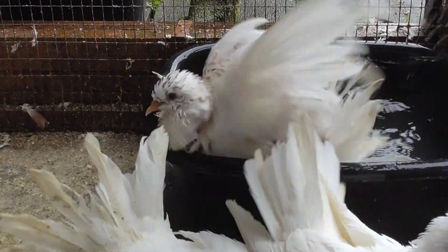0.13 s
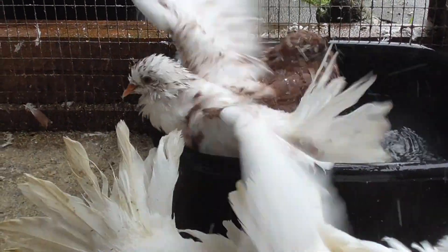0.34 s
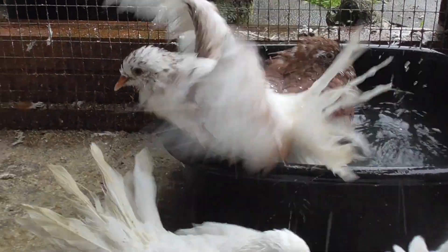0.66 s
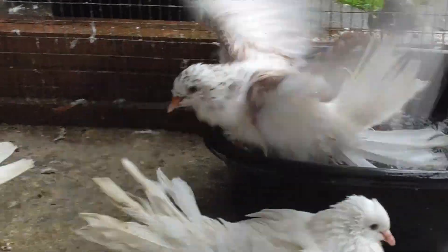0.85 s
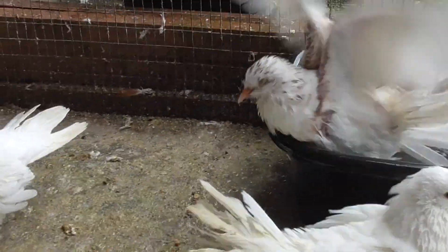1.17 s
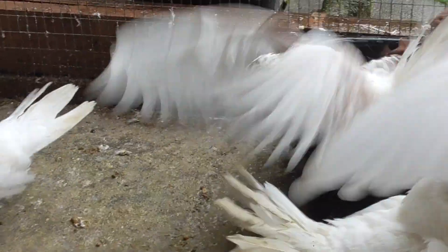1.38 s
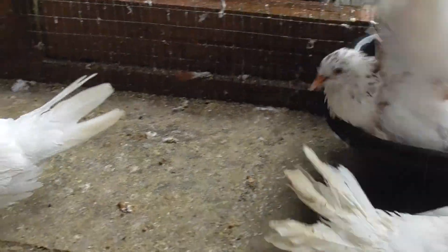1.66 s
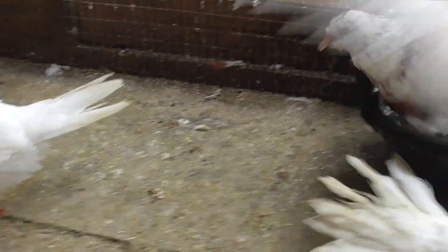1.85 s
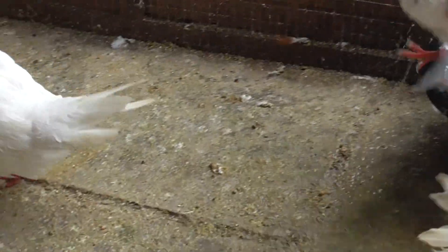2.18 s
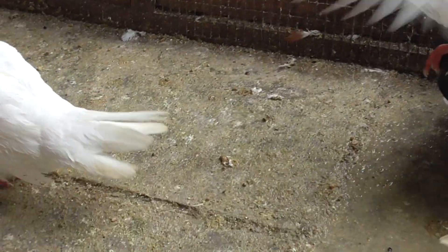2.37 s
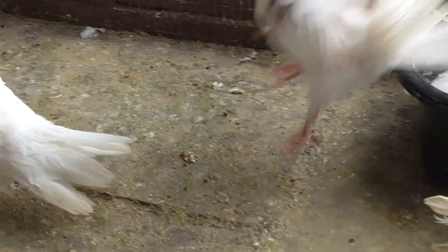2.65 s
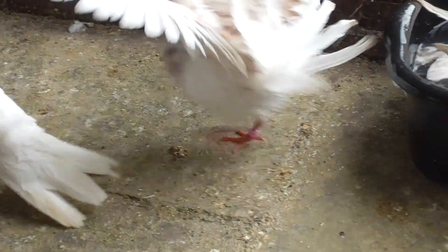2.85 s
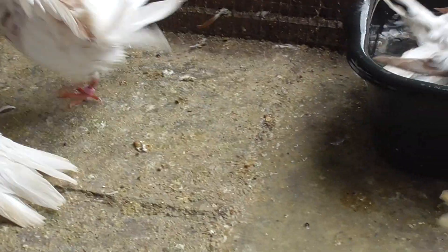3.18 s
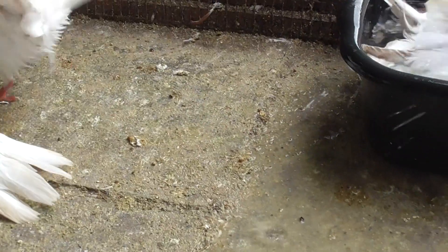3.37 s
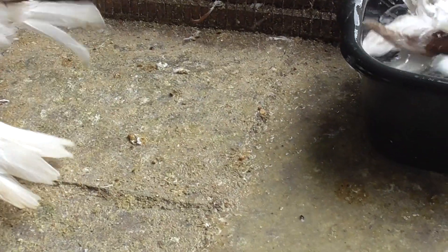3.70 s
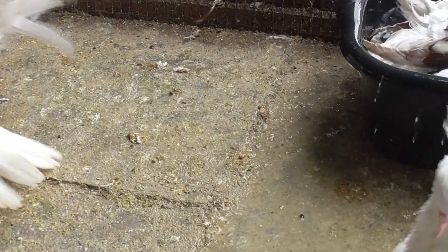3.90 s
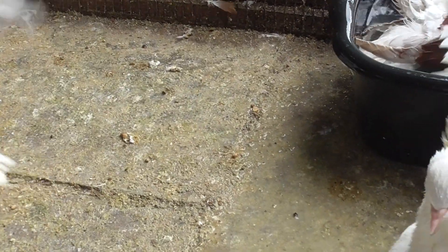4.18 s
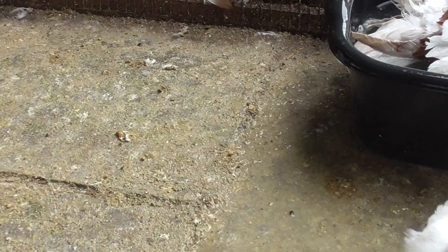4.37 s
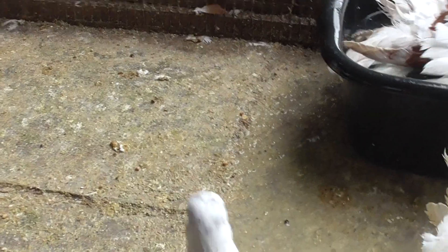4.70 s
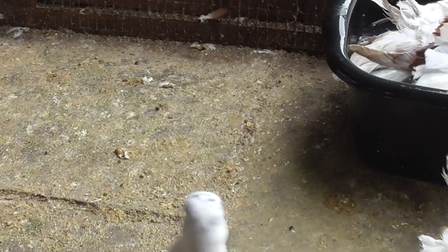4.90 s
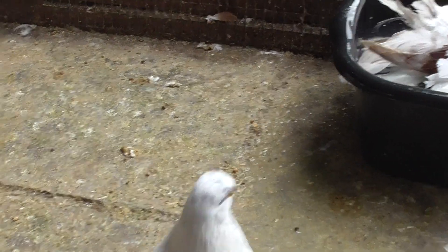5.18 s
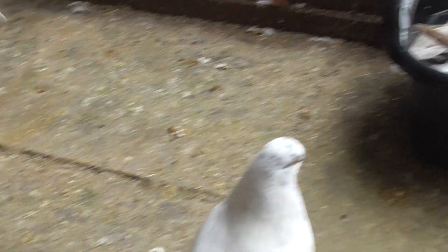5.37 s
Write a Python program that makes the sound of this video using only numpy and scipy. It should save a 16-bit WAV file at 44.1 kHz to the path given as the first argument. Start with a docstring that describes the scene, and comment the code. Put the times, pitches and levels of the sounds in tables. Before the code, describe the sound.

Pigeons bathe in a plastic tub, heard very close in an aviary, in wide stereo with a short dry reflection. At first there is quiet dripping, feather flicks and a light wing slap at 0.3 s. From 0.7 s wings beat in soft, low, airy thumps, each with a slap on water and crisp high spray; strokes crowd together from 1.3 to 2.1 s, strongest near 1.45. Then the beating stops: scattered drips, tiny flicks and clear bubbly plops around 2.2 to 3.0 s. From about 3.1 to 3.6 s a bird shakes itself, roughly ten even swings per second, swelling with rustling quills and flung droplets. A few plops follow. Wingbeats return softly near 3.9 s, growing to a dense flurry from 4.4 s through 5.4 s, rumbling, slapping and spattering, then easing at the end. Faint low hum and muted outdoor air lie underneath.

```python
"""In an aviary, close by, pigeons bathe in a plastic tub. Each wing stroke drives a decaying pulse of air, slaps the
water and throws spray; eddies rumble as shaped noise. Wet feathers flick and drops patter back as trains of
tiny impacts, and the stirred water sounds through ringing bubbles. The beating pauses while a bird shakes itself
in even swings, then resumes and builds to a flurry. A faint hum and outdoor air lie underneath."""
import sys
import numpy as np
from scipy import signal
from scipy.fft import rfft, irfft, next_fast_len
from scipy.io import wavfile

SR = 44100
rng = np.random.default_rng(int(sys.argv[2]) if len(sys.argv) > 2 else 0)


def to_wav(s):
    """Save 16-bit WAV."""
    ch = np.atleast_2d(s).T  # columns
    pcm = np.round(np.clip(ch, -1, 1) * 32767)  # PCM
    wavfile.write(sys.argv[1], SR, pcm.astype(np.int16))


N = 244314
TIME = np.arange(N) / SR

# Spectrum of droplet impacts: f/Hz, relative density level/dB
SPRAY_SPECTRUM = [(700, -21), (1500, -7.5), (2150, -5), (2800, -10.5), (3500, -5), (4500, -4), (5500, -8.5),
                  (6500, -7.5), (8600, 0.5), (10200, 0), (11700, -1.5), (13500, -9), (15800, -24)]
# How hard the birds stir the bath between strokes: t/s, relative level/dB
AGITATION = [(0.16,-66.5), (0.29,-48.5), (0.75,-48.5), (1.45,-46.5), (1.9,-38.5), (2.29,-57), (2.8,-53.5),
             (3.45,-44.5), (3.92,-56), (4.33,-49.5), (4.52,-36.5), (4.64,-46), (4.95,-45), (5.33,-37.5),
             (5.46,-50)]
# Wing strokes: t/s, relative level of the air thump/dB, thump f/Hz, relative level of the slap on the water/dB
STROKES = [(0.279,-36,260,-41), (0.682,-40,220,-38), (0.704,-30,220,-36), (0.833,-21.5,176,-40.5),
           (1.092,-24,252,-33), (1.342,-21.5,183,-46), (1.451,-15.5,175,-25.5), (1.54,-48,206,-36),
           (1.624,-26.5,237,-32.5), (1.694,-23.5,250,-32), (1.877,-27.5,206,-43), (2.016,-21,191,-27.5),
           (2.126,-26,177,-34), (3.855,-42,220,-37), (3.997,-33.5,199,-38.5), (4.133,-27,184,-39.5),
           (4.271,-24.5,214,-38.5), (4.41,-19,229,-30.5), (4.467,-20,288,-33), (4.507,-15,239,-25),
           (4.57,-16,211,-27), (4.594,-15.5,344,-37), (4.699,-25,245,-32), (4.828,-22,210,-30),
           (4.898,-22.5,206,-40), (4.961,-21,213,-36), (5.068,-30,225,-31), (5.086,-16.5,199,-39),
           (5.206,-20.5,202.5,-37), (5.265,-24,231,-28), (5.296,-17,310,-28.5), (5.359,-23,264,-38.5),
           (5.407,-22.5,212,-35.5)]
THUMP_LAG_S = 0.00378   # the air pulse peaks just after the wing lands


def from_db(db):
    """Level to amplitude ratio: 20 dB is a factor of ten."""
    return 10 ** (np.asarray(db) / 20)


def rms_one(x):
    """Normalise to unit root-mean-square amplitude."""
    return x / np.sqrt(np.mean(x ** 2) + 1e-20)


def at_hz(points, hz):
    """Interpolate a spectrum linearly on a logarithmic frequency axis."""
    f, value = np.transpose(points)
    return np.interp(np.log(np.maximum(hz, 1)), np.log(f), value)


def in_time(curve, trim_db):
    """Interpolate a level curve at every sample and shift it by a trim."""
    return np.interp(TIME, *np.transpose(curve)) + trim_db


def colour(x, spectrum):
    """Minimum-phase filter: folding the cepstrum makes it causal; white input keeps its power."""
    size = 2 * next_fast_len(N // 2 + 8192)
    hz = np.arange(size // 2 + 1) * SR / size
    gain = rms_one(from_db(at_hz(spectrum, hz)))
    cepstrum = irfft(np.log(gain))
    cepstrum[1:size // 2] *= 2
    cepstrum[size // 2 + 1:] = 0
    response = np.exp(rfft(cepstrum))
    return irfft(rfft(x, size) * response)[..., :N]


def spread(pair):
    """Interchannel coherence: mid and side shares of unrelated signals set the likeness per frequency."""
    # Left-right likeness: f/Hz, correlation
    likeness = [(130,1), (280,0.98), (550,0.6), (2000,0.78), (4000,0.61), (12000,0.17)]
    size = 2 * next_fast_len(N // 2 + 1)
    hz = np.arange(size // 2 + 1) * SR / size
    alike = np.clip(at_hz(likeness, hz), 0, 1)
    shares = np.sqrt([(1 + alike) / 2, (1 - alike) / 2])
    mid, side = irfft(rfft(pair, size) * shares)[:, :N]
    return np.array([mid + side, mid - side])


def pan(db):
    """Interchannel level difference, left minus right, as two gains."""
    return from_db([[db / 2], [-db / 2]])


def add(out, s, sound):
    """Superpose a short sound at time s."""
    start = int(np.clip(s * SR, 0, N - 1))
    out[..., start:start + sound.shape[-1]] += sound[..., :N - start]


def bursts(rows, length_s, rise_share, tail_db, tail_s):
    """Envelope of (t/s, level/dB) events whose powers add: Gaussian rise, exponential fall and a tail."""
    power = np.zeros(N)
    rise_share = np.clip(rise_share, .05, .9)
    for s, db in rows:
        near = slice(max(int((s - .05) * SR), 0), int((s + .25) * SR))
        t = TIME[near] - s
        swell = np.exp(-(t / (rise_share * length_s)) ** 2)
        fall = np.exp(-abs(t) / ((1 - rise_share) * length_s))
        tail = from_db(tail_db) ** 2 * np.exp(-abs(t) / tail_s)
        power[near] += from_db(db) ** 2 * np.where(t < 0, swell, fall + tail)
    return np.sqrt(power)


def clumps(per_s, depth_db):
    """Random modulation: water lands in uneven handfuls, so its gain wanders quickly."""
    knots = np.minimum(rng.standard_normal(N // 100), 1.6)
    return from_db(depth_db * np.interp(TIME * per_s, np.arange(len(knots)), knots))


def droplets(per_s):
    """Shot noise: two channels of tiny impacts of uneven size at shared random times; unit rms."""
    born = rng.random(N) < per_s / SR
    sizes = from_db(2.5 * np.minimum(rng.exponential(1, N), 4))
    return rms_one(born * sizes * rng.standard_normal((2, N)))


def bubble(hz, cycles, glide):
    """Damped resonance of a trapped air pocket, rising in pitch as it nears the surface."""
    age = np.arange(int(cycles / hz * SR) + 2) * hz / SR / cycles   # 1 when 60 dB down
    return from_db(-60 * age) * np.sin(2 * np.pi * cycles * (age + glide * age ** 2 / 2))


def bubbles(strength, spectrum, low_hz, high_hz, cycles, range_db, count):
    """Random superposition of bubbles of many sizes, each as strong as the water is stirred at its birth."""
    out = np.zeros((2, N))
    for when, size, faint, side, life in rng.random((count, 5)):
        hz = low_hz * (high_hz / low_hz) ** size
        gain = strength[int(when * N)] * from_db(at_hz(spectrum, hz) / 2 - range_db * faint)
        ringing = bubble(hz, cycles * (.5 + life), glide=0.091)
        add(out, when * N / SR, gain * pan(10 * (side - .5)) * ringing)
    return out


def outdoor_air(level_db):
    """Stationary broadband noise, spectrally shaped, gives the outdoor air."""
    # Outdoor spectrum: f/Hz, relative density level/dB
    outdoor_spectrum = [(25,-15), (55,-32), (85,5), (125,3.5), (260,1.5), (410,-10), (1000,-8.5),
                        (1700,-27.5), (6000,-75), (10000,-25), (15500,-36)]
    return from_db(level_db) * spread(colour(rng.standard_normal((2, N)), outdoor_spectrum))


def hum(hz, level_db):
    """A steady pure tone; the root of two makes the level that of its rms."""
    return from_db(level_db) * np.sqrt(2) * np.sin(2 * np.pi * hz * TIME)


def aviary(x, t60, wet_db):
    """Reverberation: floor and boards return a diffuse echo, convolved as exponentially decaying noise."""
    t = TIME[:SR // 2]
    noise = spread(rng.standard_normal((2, N)))[:, :len(t)]
    tail = noise * from_db(-60 * t / t60) * (t > .004)   # the first 4 ms stay silent
    tail /= np.sqrt(np.sum(tail ** 2) / 2)
    return x + from_db(wet_db) * signal.fftconvolve(x, tail, axes=-1)[:, :N]


def tub(x, ring_hz, width_hz, ring_db):
    """Forced resonance: the plastic wall rings on briefly after each push."""
    ringing = signal.lfilter(*signal.iirpeak(ring_hz, ring_hz / width_hz, fs=SR), x)
    return x + from_db(ring_db) * ringing


def shake(count):
    """Periodic envelope: a bird shakes itself in even swings that swell to a peak and die away."""
    start_s, period_s, swing_s = 3.117, .098, 0.022
    peak_s, peak_db = 3.49, -32   # level before each layer's own trim
    swell_db_per_s, fade_db_per_s = 25, 31
    s = start_s + period_s * np.arange(count)
    db = peak_db - np.maximum(swell_db_per_s * (peak_s - s), fade_db_per_s * (s - peak_s))
    return bursts(zip(s, db), swing_s, rise_share=0.49, tail_db=-4.5, tail_s=0.013)


def rustle(shaking, centre_hz, width_hz, level_db):
    """Friction as band-passed shot noise: quills rub over each other on every swing of the shake."""
    band = signal.iirpeak(centre_hz, centre_hz / width_hz, fs=SR)
    rubbing = signal.lfilter(*band, droplets(per_s=2600))
    return from_db(level_db) * shaking * spread(rms_one(rubbing))


def ticks(fall_db, per_s, spread_db):
    """Sparse impulses: heavier drops hit the rim or the floor with single ticks."""
    born = rng.random(N) < per_s / SR
    sizes = from_db(fall_db + spread_db * np.minimum(rng.exponential(1, N), 3))
    return spread(colour(born * sizes * rng.standard_normal((2, N)), SPRAY_SPECTRUM))


def slaps(tail_db, tail_s):
    """Impact envelope of the wings landing on the water: fast rise, slower decay."""
    landings = [(s, db) for s, _, _, db in STROKES]
    return bursts(landings, length_s=0.0083, rise_share=0.18, tail_db=tail_db, tail_s=tail_s)


def flicks():
    """Transient envelope of wet feathers: sharp flicks, and random small ones that follow the agitation."""
    # Sharpest flicks of wet feathers: t/s, relative level/dB
    feather_flicks = [(0.333,-33.5), (0.395,-39.5), (0.553,-41.5), (0.682,-33.5), (0.8,-37.5), (1.051,-32),
                      (1.309,-34), (1.364,-35.5), (1.452,-32.5), (1.576,-34.5), (1.693,-26), (1.771,-29.5),
                      (1.819,-28.5), (1.916,-36), (1.964,-34.5), (2.016,-31.5), (2.234,-42), (2.536,-43.5),
                      (2.706,-45), (2.85,-40), (3.018,-36), (3.207,-35.5), (3.855,-42.5), (4.476,-31.5)]
    small_per_s, small_db, small_spread_db = 21, -2.5, 12   # levels relative to the agitation
    when, size = rng.random((int(small_per_s * N / SR), 2)).T
    s = when * N / SR
    db = np.interp(s, *np.transpose(AGITATION)) + small_db + small_spread_db * (2 * size - 1)
    rows = [*feather_flicks, *zip(s, db)]
    return bursts(rows, length_s=0.0044, rise_share=0.63, tail_db=-5.5, tail_s=0.009)


def spray(fall_db, shaking, flick_db, slap_db, mist_db, drips_db):
    """Modulated shot noise: feathers throw droplets, which patter back over fine mist and tinkle as bubbles."""
    fall = from_db(fall_db) * clumps(per_s=60, depth_db=2.8)
    mist = from_db(mist_db) * rng.standard_normal((2, N))
    patter = fall * (droplets(per_s=660) + mist)
    flicked = from_db(flick_db) * flicks()
    slapped = from_db(slap_db) * slaps(tail_db=-2.5, tail_s=0.011)
    thrown = np.sqrt(flicked ** 2 + slapped ** 2 + shaking ** 2)   # powers add
    drips = bubbles(np.hypot(fall, thrown), SPRAY_SPECTRUM, low_hz=3000, high_hz=11000,
                    cycles=40, range_db=20, count=1000)
    impacts = patter + thrown * droplets(per_s=10000)
    return spread(colour(impacts, SPRAY_SPECTRUM)) + from_db(drips_db) * drips


def plops(level_db):
    """Bubble resonance: large drops each trap one clear bubble."""
    # Single large drops: t/s, relative peak level/dB, bubble f/Hz
    large_drops = [(0.178,-38,650), (0.681,-22.5,730), (1.134,-27,1270), (2.189,-28.5,1386),
                   (2.55,-30,9500), (2.619,-41,3970), (2.924,-31.5,5900), (3.003,-32,1295), (3.492,-20,790),
                   (3.696,-24.5,1276), (3.789,-30,716)]
    out = np.zeros(N)
    for s, db, hz in large_drops:
        add(out, s, from_db(db + level_db) * bubble(hz, cycles=41, glide=0.057))
    return out


def water(slosh_db, shaking, slap_db, smack_db, bubbles_db, churn_db):
    """Impact and entrainment: wings smack the surface; slaps and sloshing churn it and fold in air."""
    # Spectrum of struck water: f/Hz, relative density level/dB
    water_spectrum = [(200,-8.5), (420,-2), (720,3.5), (950,-0.5), (1250,-0.5), (1600,-17.5), (2200,-13.5),
                      (2900,-19), (6000,-36)]
    # Waves slopping against the tub wall: t/s, relative level/dB
    slop_times = [(1.135,-35), (2.187,-41), (3.372,-39)]
    smacks = np.zeros(N)
    for s, _, _, db in STROKES:
        smacks[int(s * SR)] = from_db(db + smack_db)   # one impulse per landing
    slosh = from_db(slosh_db) * clumps(per_s=58, depth_db=5.0)
    slops = bursts(slop_times, length_s=0.025, rise_share=.15, tail_db=-12, tail_s=.02)
    landed = from_db(slap_db) * np.hypot(slaps(tail_db=-17.5, tail_s=0.011), slops)
    struck = np.hypot(landed, shaking)
    churn = np.hypot(slosh * from_db(churn_db), struck) * droplets(per_s=7000)
    gurgle = bubbles(np.hypot(slosh, struck), water_spectrum, low_hz=380, high_hz=2000,
                     cycles=22, range_db=15, count=900)
    surface = colour(smacks, water_spectrum) + spread(colour(churn, water_spectrum))
    return surface + from_db(bubbles_db) * gurgle


def wing_air(draught_trim_db, shaking, beat_db, beat_s):
    """Turbulence noise: eddies shed by the wings rumble around each stroke and each swing of the shake."""
    # Spectrum of the eddies: f/Hz, relative density level/dB
    air_spectrum = [(30,-28), (70,-29), (105,-12), (135,2), (178,3.5), (240,-3.5), (335,-2), (420,-10.5),
                    (600,-21.5), (1200,-34.5)]
    # Air swirling round the wings: t/s, relative level/dB
    draught_curve = [(0,-56.5), (0.6,-41.5), (1.05,-32), (2.1,-32.5), (2.35,-44), (3.9,-44.5), (4.5,-32.5),
                     (5.35,-26), (5.5,-38.5)]
    draught = from_db(in_time(draught_curve, draught_trim_db))
    strokes = [(s + THUMP_LAG_S, db + beat_db) for s, db, _, _ in STROKES]
    beats = bursts(strokes, beat_s, rise_share=0.46, tail_db=-10.0, tail_s=0.0079)
    strength = np.sqrt(draught ** 2 + beats ** 2 + shaking ** 2)
    return strength * spread(colour(rng.standard_normal((2, N)), air_spectrum))


def wing_thumps(level_db, sag):
    """Pressure pulse: each stroke shoves out air that swings a few times and sinks a little in pitch."""
    rise_s = 0.01058
    out = np.zeros(N)
    age = np.arange(SR // 10) / SR / rise_s   # 1 at the peak of the pulse
    pulse = (age * np.exp(1 - age)) ** 2
    sagging_age = age + sag * (2 * np.log1p(age) - age)   # passes the listed pitch at the peak
    for s, db, hz, _ in STROKES:
        phase = 2 * np.pi * (hz * rise_s * sagging_age + rng.random())
        thump = from_db(db + level_db) * np.sqrt(2) * pulse * np.sin(phase)
        add(out, s + THUMP_LAG_S - rise_s, thump)
    return out


def scene():
    """Superposition of the reverberant bath, quiet outdoor air and a hum."""
    background = outdoor_air(level_db=-47) + hum(hz=59.8, level_db=-58.5)
    shaking = shake(count=6)
    drops = spray(in_time(AGITATION, trim_db=-2.5), shaking * from_db(0.7),
                  flick_db=3.5, slap_db=-5.5, mist_db=2.5, drips_db=10.5)
    drops += ticks(in_time(AGITATION, trim_db=12.5), per_s=50, spread_db=4.5)
    drops += rustle(shaking, centre_hz=3730, width_hz=1300, level_db=-7)
    splash = water(in_time(AGITATION, trim_db=3.0), shaking * from_db(-2.0),
                   slap_db=3.5, smack_db=21.5, bubbles_db=10.0, churn_db=0.0)
    splash += plops(level_db=-0.5)
    wings = wing_air(draught_trim_db=-3, shaking=shaking * from_db(1.0), beat_db=-3, beat_s=0.018)
    wings += wing_thumps(level_db=-2.5, sag=0.34)
    wings = tub(wings, ring_hz=326, width_hz=91, ring_db=-5)
    bath = wings + splash * pan(db=-0.4) + drops * pan(db=-1.0)
    return aviary(bath, t60=0.12, wet_db=-14) + background


def record(dry):
    """Low-pass filtering: a steep elliptic filter cuts the top above 15.7 kHz."""
    low_pass = signal.ellip(12, .1, 80, 15700, fs=SR, output="sos")   # order, ripple/dB, stop/dB, f/Hz
    return signal.sosfilt(low_pass, dry)


dry = scene()
out = record(dry)
to_wav(out)
```